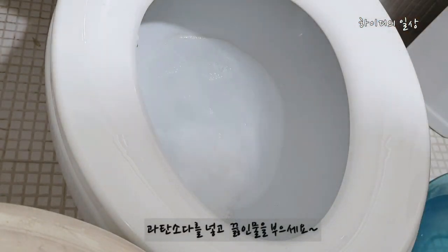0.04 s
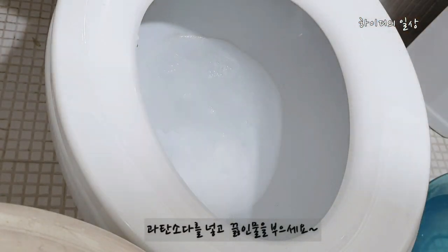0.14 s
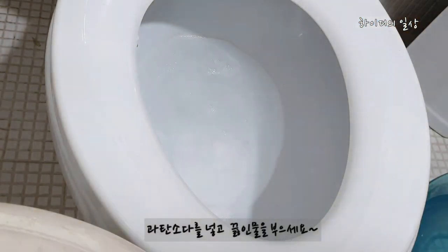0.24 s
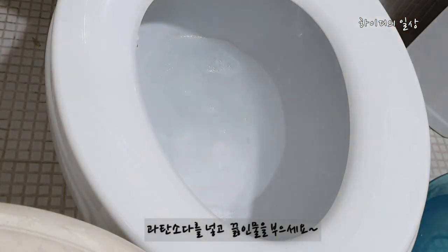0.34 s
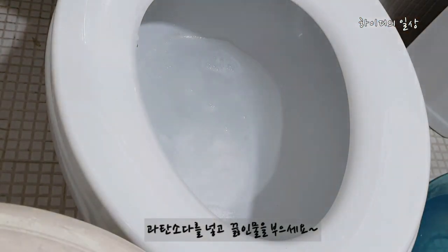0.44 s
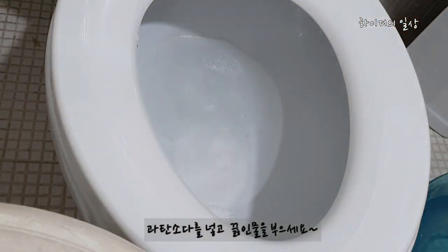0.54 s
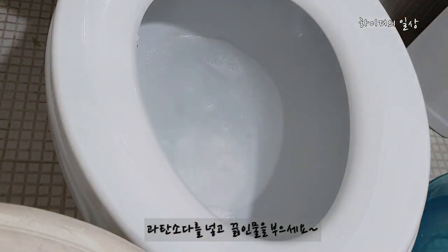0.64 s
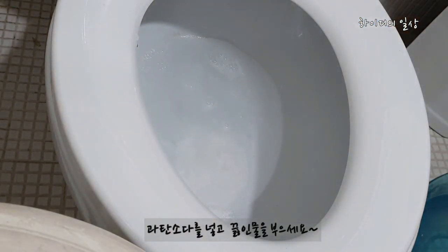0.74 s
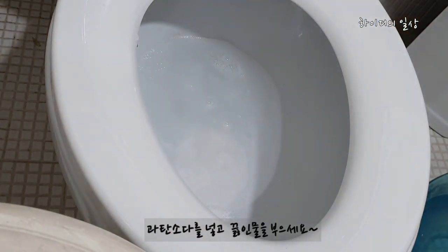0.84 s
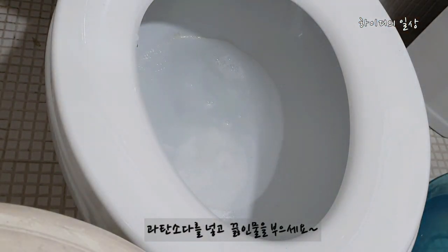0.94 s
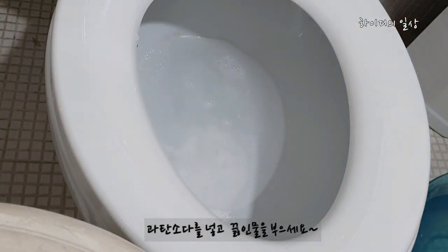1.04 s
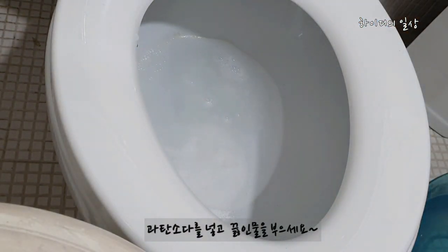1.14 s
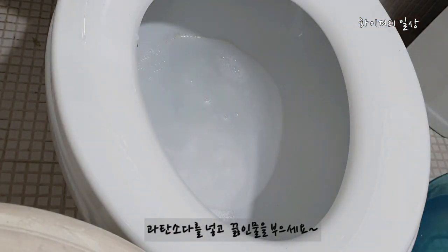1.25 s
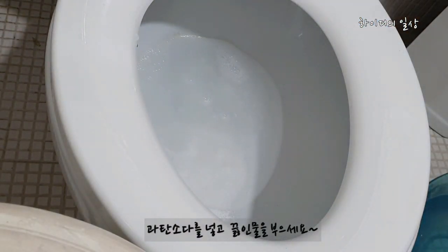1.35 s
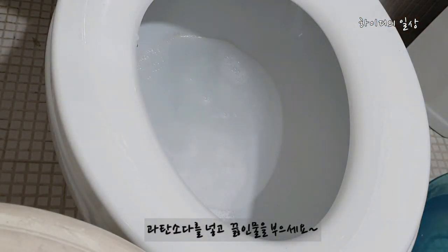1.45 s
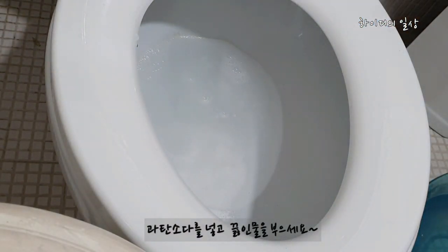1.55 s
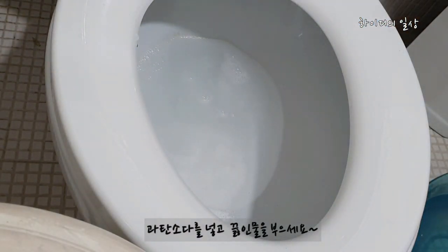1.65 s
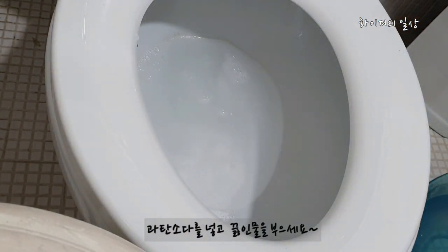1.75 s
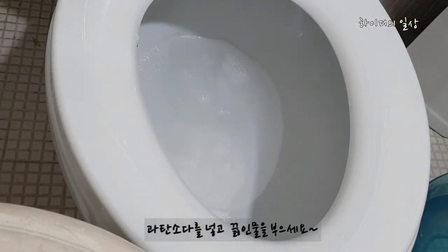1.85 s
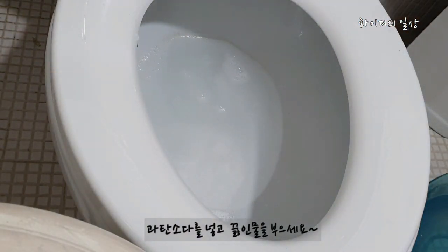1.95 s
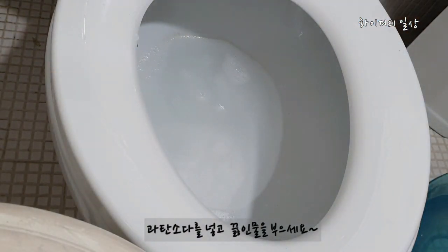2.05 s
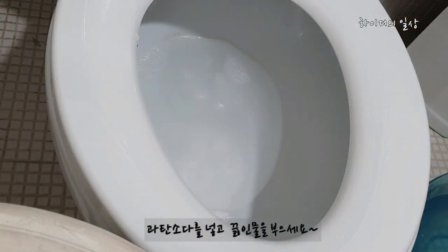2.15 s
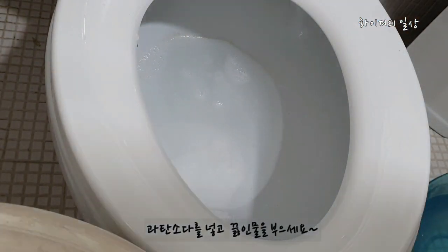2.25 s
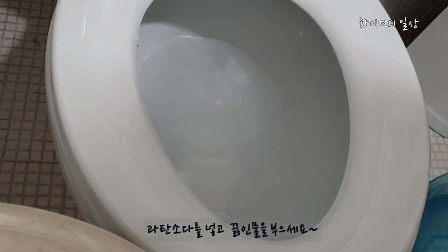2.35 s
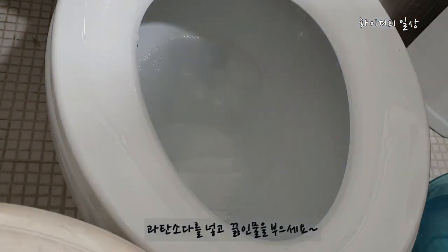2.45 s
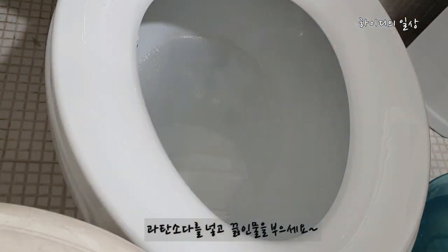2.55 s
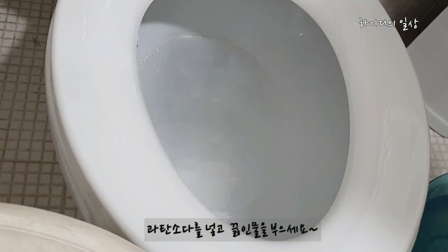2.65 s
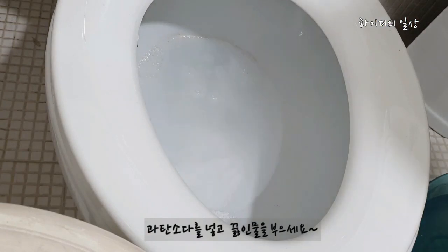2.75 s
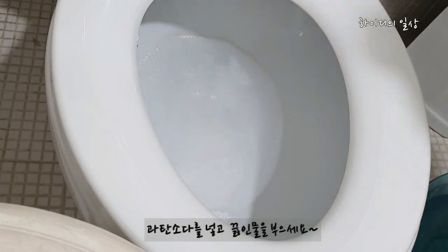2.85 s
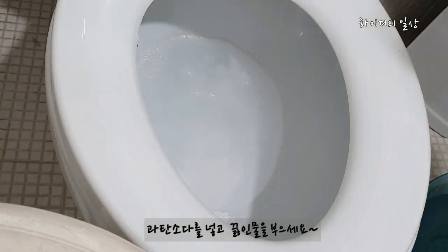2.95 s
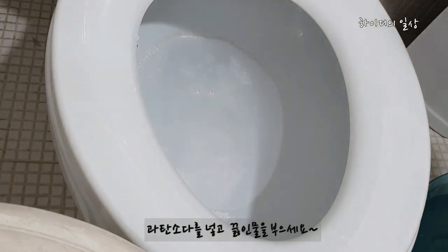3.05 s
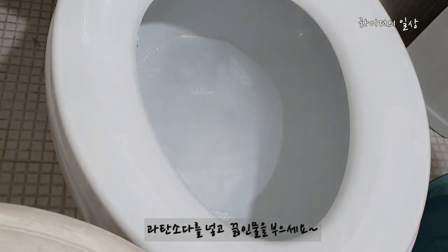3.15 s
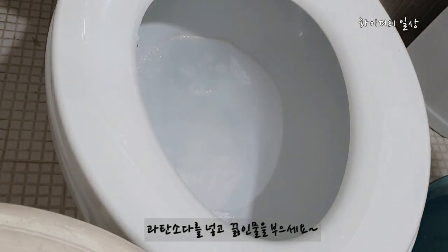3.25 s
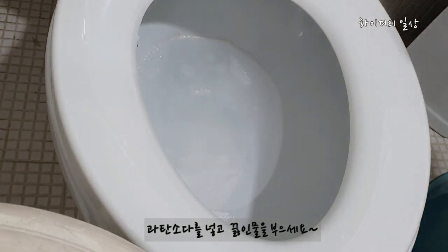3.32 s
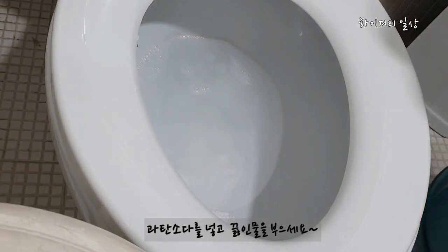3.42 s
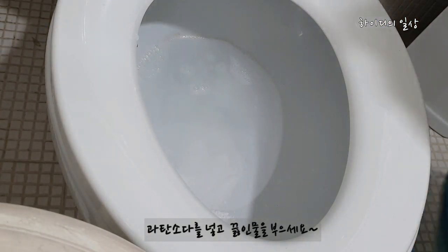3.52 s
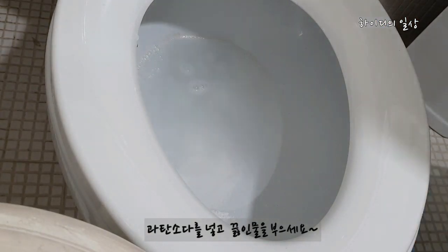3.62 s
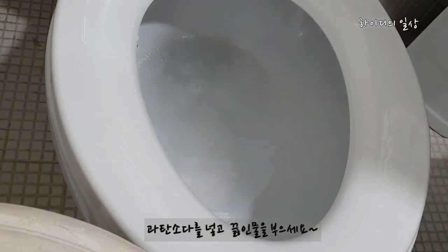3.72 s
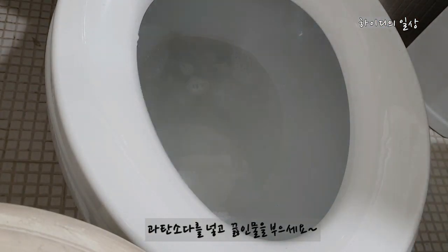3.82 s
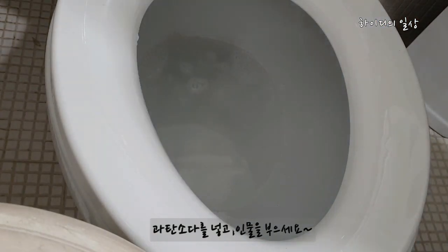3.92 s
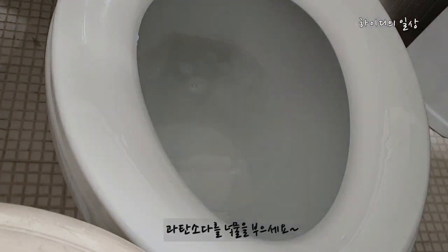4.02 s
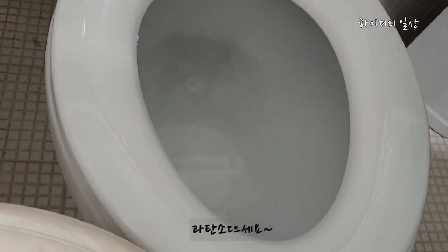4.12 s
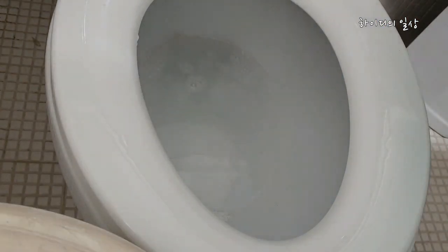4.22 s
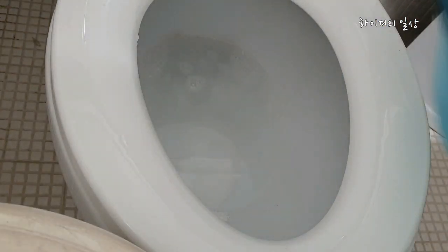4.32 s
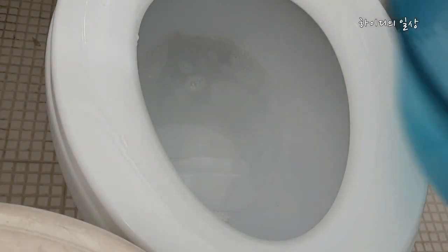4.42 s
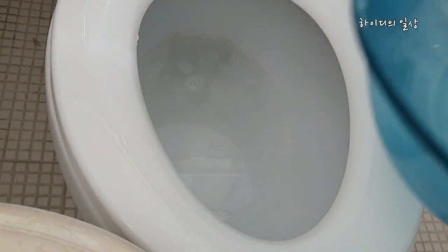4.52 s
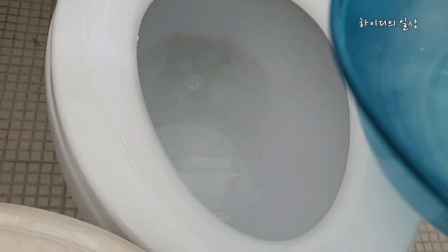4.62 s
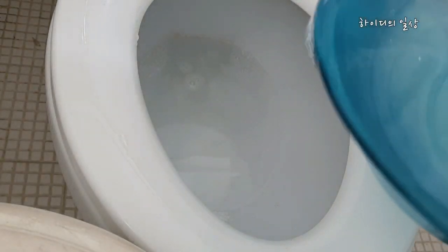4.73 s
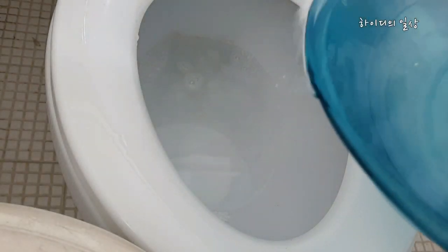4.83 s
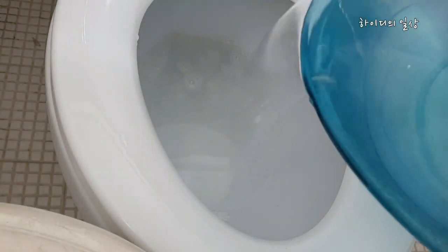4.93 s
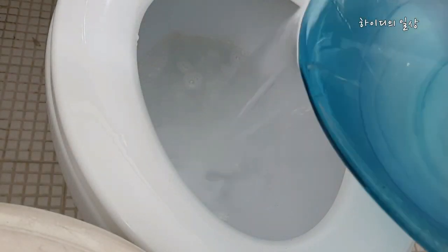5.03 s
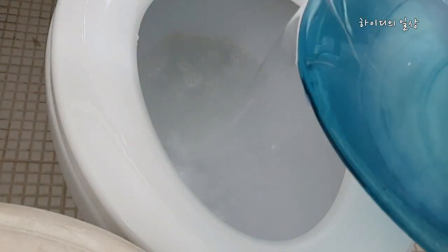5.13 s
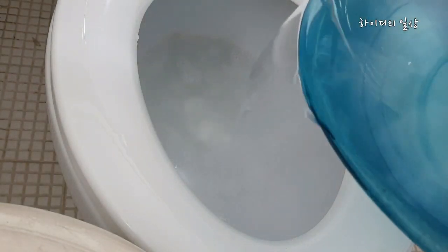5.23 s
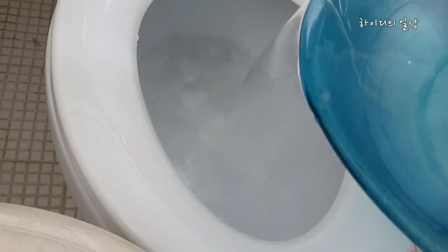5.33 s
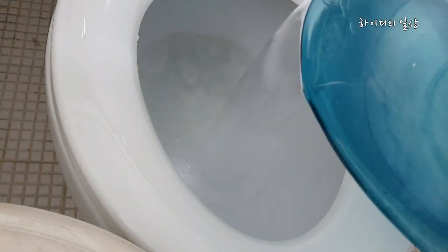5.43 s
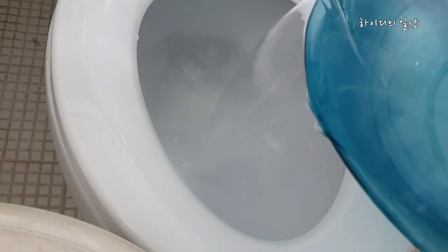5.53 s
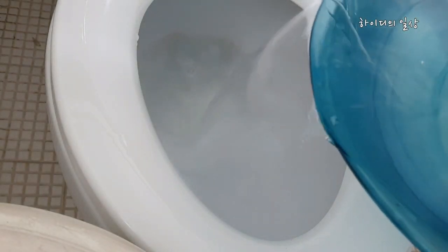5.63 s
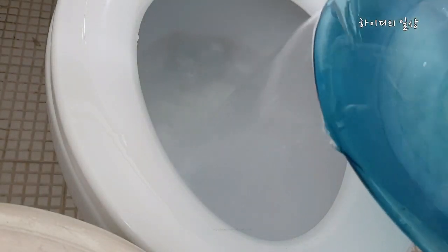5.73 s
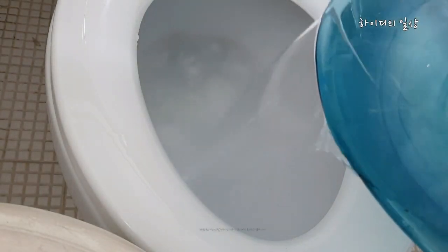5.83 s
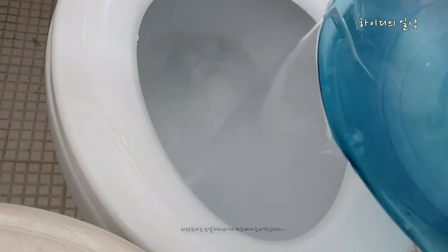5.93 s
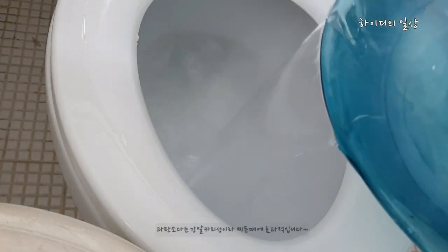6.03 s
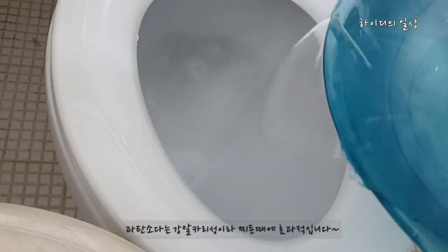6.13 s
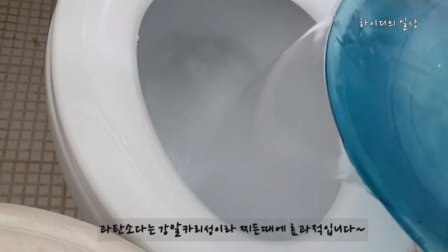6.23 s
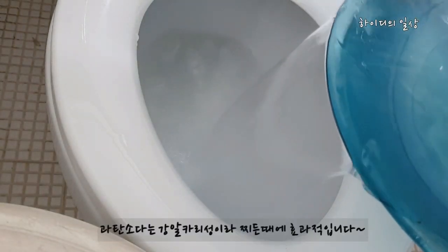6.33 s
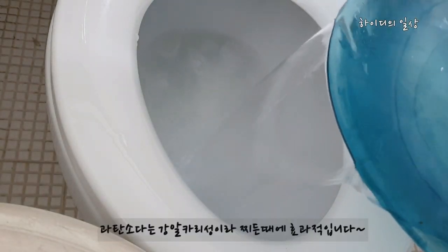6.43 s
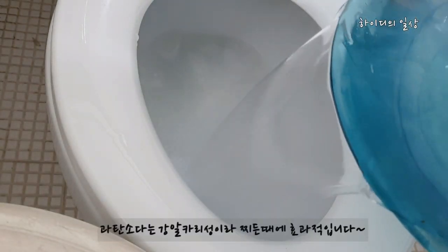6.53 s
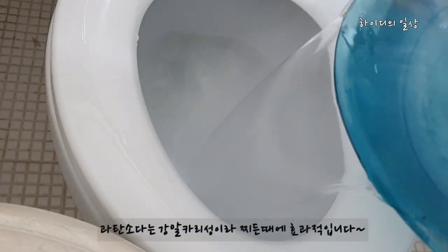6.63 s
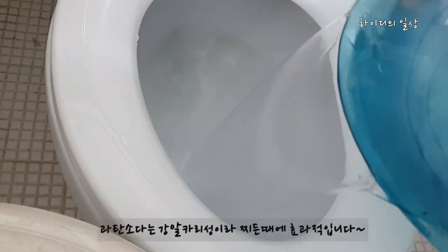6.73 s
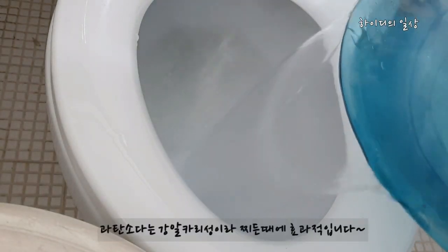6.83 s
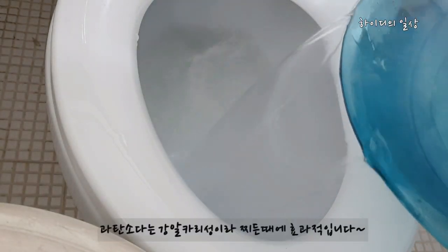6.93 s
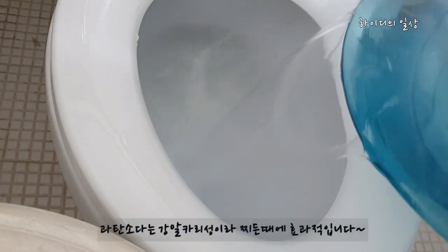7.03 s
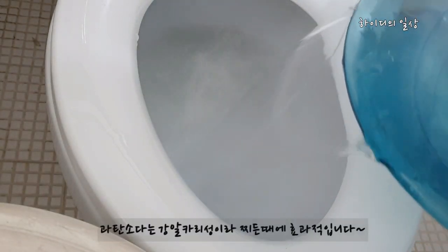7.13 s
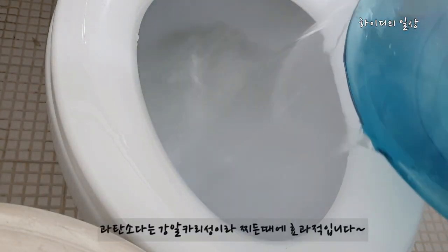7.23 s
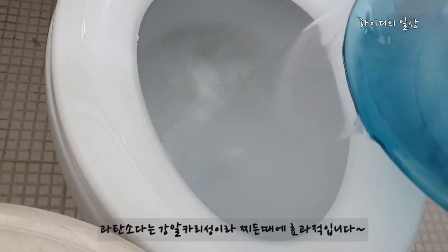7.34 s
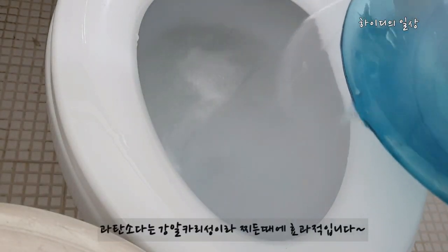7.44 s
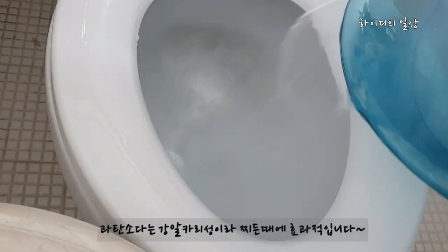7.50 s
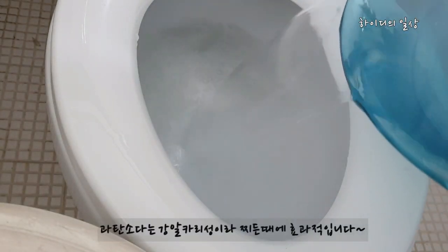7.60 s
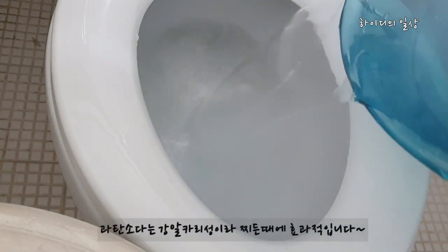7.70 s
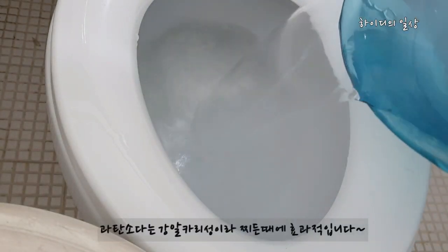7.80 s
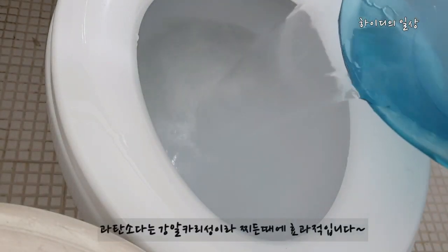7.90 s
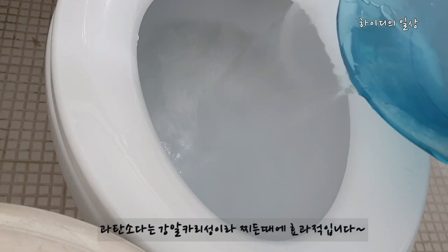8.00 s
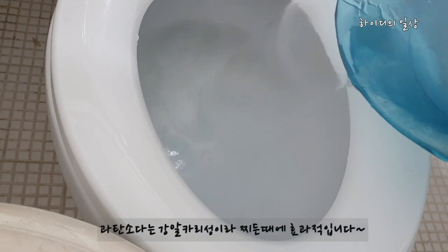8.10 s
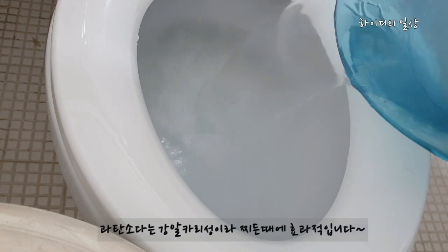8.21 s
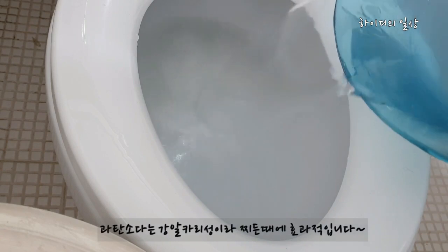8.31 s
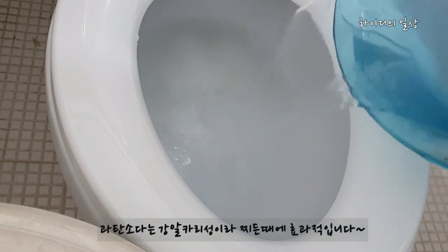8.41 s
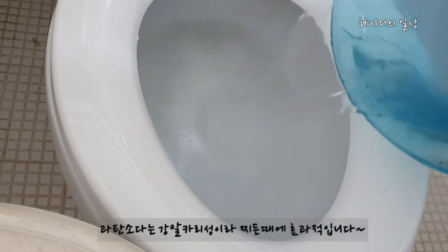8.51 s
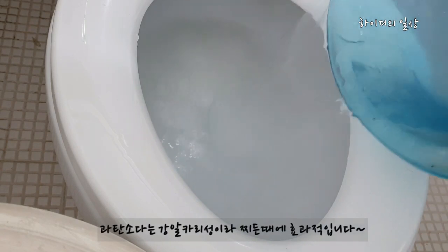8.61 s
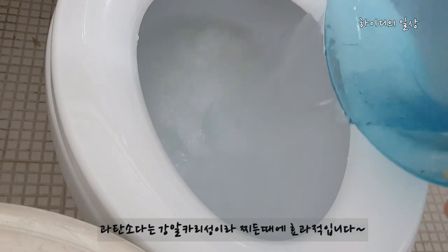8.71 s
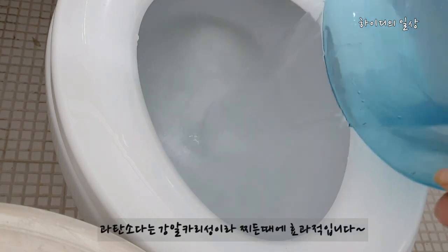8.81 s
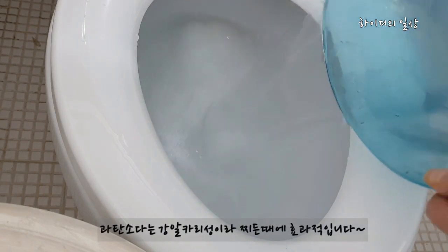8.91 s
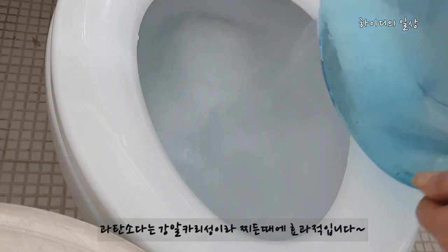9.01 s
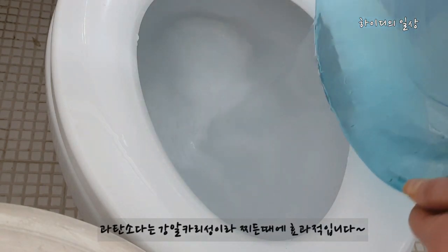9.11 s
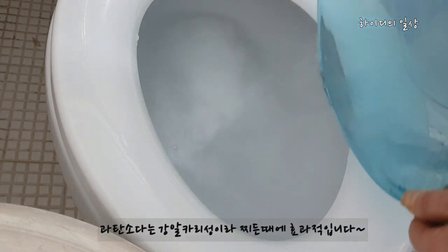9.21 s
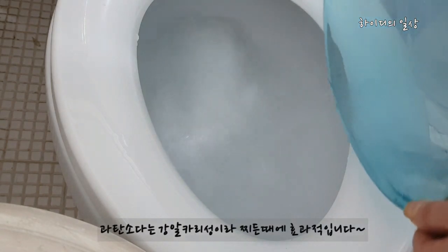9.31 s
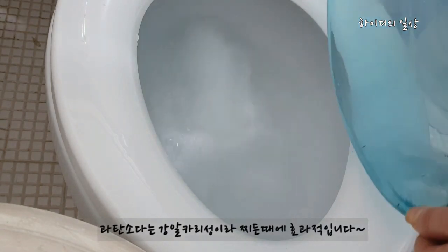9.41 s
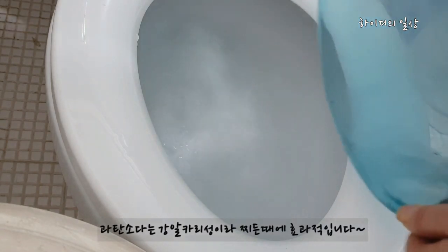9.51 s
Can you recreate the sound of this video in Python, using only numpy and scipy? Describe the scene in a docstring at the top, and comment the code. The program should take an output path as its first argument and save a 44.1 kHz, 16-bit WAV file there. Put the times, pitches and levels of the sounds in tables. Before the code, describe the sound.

A small tiled bathroom, heard close in stereo, with a faint hiss and a low throbbing rumble that fades after the opening seconds. From 0 to 1 s a plastic basin gives soft dull knocks, thin ticks and brief floor scuffs. At about 1.25 s it rocks with a heavy hollow clunk, a quick clatter of blows dying within 0.2 s. Sparse light knocks and ticks follow from 2 to 4.2 s, a clearer one near 3.2 s. At 4.5 s it bumps the toilet seat dully, then taps faintly. A sharper knock at 5.07 s launches the pour: a full, bright, fizzing splash with dense bubbles, surging until about 7.5 s, resonating in the bowl. From 7.7 s deep gulps around 300 Hz take over, strongest near 7.9 s. After 8.4 s the stream is thin and broken, with plops, slaps and drips continuing to about 9.5 s.

```python
"""A plastic basin is handled in a small tiled bathroom: impacts excite its damped modes in knocks,
scuffs and a heavy clunk. It then bumps a toilet seat, tips and is emptied into the bowl.
The falling sheet of water is a swarm of damped-sine bubbles of all sizes with fine spray and slaps.
As it thins, deep gulps take over. Echoes and air modes of the bowl color the water and the contacts;
lingering notes, a low throbbing rumble and a faint hiss stay outside that resonance."""
import sys
import numpy as np
from scipy import signal
from scipy.fft import rfft, irfft, next_fast_len
from scipy.io import wavfile
from scipy.ndimage import uniform_filter1d

SR = 44100
rng = np.random.default_rng(int(sys.argv[2]) if len(sys.argv) > 2 else 0)


def to_wav(sig):
    """Store sig (one row per channel, or 1-D mono) as 16-bit WAV at the path in sys.argv[1].

    Samples outside -1..1 are clipped; the rate is SR.
    """
    pcm = np.clip(np.atleast_2d(sig), -1, 1) * 32767
    pcm = np.round(pcm).astype(np.int16)
    wavfile.write(sys.argv[1], SR, pcm.T)  # frames by channels


N = 421596
TIME = np.arange(N) / SR

# In every table level_db is relative: the source or filter that reads it may add its own gain.
# strength of the stream as the basin tips and empties: start_s, level_db
STREAM_FLOW = [(5.15, 0), (5.35, 0), (5.48, -3.5), (5.58, 0), (5.76, -3.5), (5.92, 1), (6.36, -1.5),
               (6.9, 1.5), (7.3, 1.5), (7.55, -2), (8.0, -3.5), (8.3, -4.5), (8.4, -7), (9.0, -8.5),
               (9.56, -8)]
# lumps of water that swell or slightly thin the splash: start_s (center), added level_db
FLOW_SURGES = [(5.17, 5), (5.56, 3.5), (5.63, -1.5), (5.93, 1), (6.03, -0.5), (6.14, 1), (6.23, 2),
               (6.49, 3.5), (6.78, 1.5), (7.68, 0.5), (7.86, 4.5), (7.93, 0.5), (8.25, 1.5), (8.69, 0),
               (9.41, 4), (9.49, 0.5)]
# how hard the water gulps air under the surface: start_s, level_db
GULP_LEVEL = [(5.15, -41), (5.26, -45.5), (5.43, -43.5), (5.6, -46.5), (6.3, -43.5), (6.8, -44.5),
              (6.95, -43), (7.72, -35.5), (7.88, -32), (8.28, -37.5), (8.38, -38.5), (8.7, -38),
              (8.87, -42), (8.99, -38.5), (9.33, -42.5), (9.41, -42), (9.56, -42)]
# size of the gulped bubbles, deeper as the sheet thins: start_s, pitch_factor [ratio]
GULP_PITCH = [(5.07, 0.43), (5.2, 1.56), (5.4, 1.39), (7.68, 1.47), (7.85, 0.92), (9.56, 0.95)]
# spectral tint of the swarms: pitch_hz, gain_db
WATER_TINT = [(40, -14), (100, -8), (200, -5.5), (300, -5), (550, -0.5), (1000, 0.5), (1800, -3.5),
              (2600, 2), (4500, -3), (5500, -2.4), (7600, 0.5), (8700, 0.5), (11000, 5), (12500, 12),
              (16000, 12)]
# clouds of like-sized bubbles dragged under by folds: start_s, length_s, level_db, pitch_hz
BUBBLE_CLOUDS = [(5.089, 0.023, -34.5, 8060), (5.327, 0.019, -32, 1116), (5.605, 0.025, -23.5, 2770),
                 (5.642, 0.021, -26, 1510), (5.792, 0.014, -30, 2380), (5.832, .03, -31, 1160),
                 (5.898, 0.1, -33, 2730), (5.915, 0.025, -29, 1700), (6.009, 0.029, -25.5, 1410),
                 (6.088, 0.0098, -39, 2950), (6.125, 0.016, -30, 2950), (6.192, 0.062, -28, 3900),
                 (6.347, 0.018, -30.5, 1420), (6.423, .02, -35.5, 910), (6.44, 0.013, -29.5, 2870),
                 (6.501, .04, -27.5, 1123), (6.711, 0.016, -30.5, 1900), (6.737, 0.11, -35.5, 438),
                 (6.802, 0.0068, -25.5, 1520), (6.887, 0.033, -34, 806), (6.94, .13, -27.5, 1930),
                 (6.993, 0.014, -30, 1900), (7.033, 0.02, -29, 890), (7.205, 0.044, -29, 740),
                 (7.233, 0.12, -25, 1530), (7.245, 0.014, -28, 1900), (7.311, 0.063, -30, 870),
                 (7.489, 0.27, -35, 464), (7.528, 0.017, -26.5, 1335), (7.635, 0.079, -26.5, 1510),
                 (7.7, 0.18, -39.5, 657), (8.23, 0.037, -45, 2430), (8.6, 0.098, -39.5, 1200),
                 (9.143, 0.044, -36, 1900), (9.28, 0.05, -34, 1820)]
# single loud bubbles: start_s, level_db, pitch_hz
LOUD_BUBBLES = [(5.081, -36, 233), (5.141, -20.5, 3920), (5.184, -26.5, 1104), (5.21, -30, 740),
                (5.221, -25, 2570), (5.238, -13, 2540), (5.30, -36, 720), (5.403, -30, 895),
                (5.417, -33, 462), (5.534, -22, 940), (5.61, -21, 2890), (5.62, -29, 927),
                (5.717, -25.5, 965), (6.02, -34, 1370), (6.056, -28.5, 420), (6.107, -24.5, 1098),
                (6.544, -32, 412), (6.14, -43.5, 300), (6.667, -36, 362.4), (6.754, -34, 440),
                (6.8, -25.5, 1600), (6.867, -27, 888), (6.926, -15.5, 2590), (7.134, -33.5, 395),
                (7.139, -27, 923), (7.162, -40, 890), (7.226, -36, 280), (7.279, -27, 1030),
                (7.329, -36, 272), (7.424, -28.5, 1001), (7.53, -37, 516), (7.638, -30, 806),
                (7.703, -28.5, 630), (7.717, -32, 1267), (7.802, -33, 285), (7.853, -22.5, 301),
                (7.911, -25, 297), (7.915, -24.5, 620), (7.948, -26.5, 1152), (7.999, -36, 1290),
                (8.022, -31, 301), (8.053, -25, 293), (8.074, -47, 333), (8.105, -30, 301),
                (8.116, -30, 1213), (8.145, -29.5, 301), (8.18, -28, 301), (8.19, -31.5, 1270),
                (8.202, -27, 297), (8.212, -43, 410), (8.233, -34, 1260), (8.234, -23, 307),
                (8.263, -25.5, 295), (8.31, -37, 632), (8.456, -30, 260), (8.459, -37, 656),
                (8.461, -39, 1320), (8.492, -31, 593), (8.494, -35, 307), (8.525, -33.5, 1253),
                (8.569, -27.5, 2640), (8.576, -35, 301), (8.627, -30.5, 301), (8.66, -38, 1270),
                (8.668, -34.5, 622), (8.689, -32, 1359), (8.735, -29, 303), (8.802, -29, 297),
                (8.823, -28, 310), (8.838, -38, 627), (8.869, -28, 300), (8.899, -29, 286),
                (8.979, -43, 640), (9.077, -43, 408), (9.179, -37, 265), (9.237, -38, 764),
                (9.249, -40, 400), (9.282, -31, 361), (9.382, -25, 260), (9.383, -33, 898),
                (9.47, -36.5, 914), (9.484, -28, 264), (9.511, -33, 297), (9.515, -41, 893)]
# decay of a loud bubble, longest in the middle sizes: pitch_hz, decay_cycles
BUBBLE_DECAY = [(280, 1.95), (450, 8.5), (1050, 10.3), (2600, 7.2), (4000, 4.4)]
# loudest drops slapping the porcelain: start_s, level_db, pitch_hz
DROP_SLAPS = [(5.127, -24, 13400), (5.355, -25, 5600), (5.409, -27, 12000), (5.572, -24, 5600),
              (5.6192, -23, 9000), (6.027, -24, 13400), (6.235, -16.5, 6400), (6.471, -28, 5080),
              (6.767, -25, 11900), (6.931, -30, 6200), (7.029, -25, 3630), (7.394, -25, 7800),
              (7.497, -25.5, 2650), (7.8523, -22.5, 5240), (7.852, -24, 13400), (7.895, -24.5, 5000),
              (7.897, -35, 13500), (7.987, -28, 6160), (8.02, -19, 12200), (8.02, -27, 5030),
              (8.134, -22, 10900), (8.189, -29, 9000), (8.236, -23.5, 2560), (8.456, -30, 3700),
              (8.4906, -22.5, 5000), (8.53, -36, 5500), (8.628, -24, 12700), (8.684, -35.5, 2380),
              (8.742, -36, 8100), (8.783, -28.5, 10800), (8.802, -27.5, 2380), (8.916, -36, 1720),
              (8.952, -33, 1900), (9.016, -29, 4840), (9.047, -33.5, 7360), (9.067, -30.5, 1900),
              (9.082, -34, 4090), (9.169, -29, 4090), (9.226, -27, 5000), (9.279, -25, 2420),
              (9.383, -27.5, 1900), (9.407, -25, 3320), (9.407, -19, 9500), (9.514, -35, 7100)]
# balance of the water between the sides: pitch_hz, left_minus_right_db
STEREO_LEAN = [(60, -3.5), (110, 3.5), (200, -1.5), (380, 4.5), (700, -1.5), (1290, 2), (2380, 2.5),
               (4400, -1), (8120, -3), (15000, -2.5)]
# air modes of the bowl: pitch_hz (before scatter), level_db (over the direct sound), t60_s
BOWL_MODES = [(130, 9, 0.44), (183, 2, 0.82), (268.7, 11.5, 0.1), (301, 15.5, 0.23), (341, -1.5, 0.36),
              (410, 5.5, 0.41), (450.8, 8.5, 0.18), (649.8, 10, 0.088), (737.5, 6.5, 0.073),
              (881, 2.5, 0.11), (981, 12.5, 0.12), (1160, 8, 0.18), (1268, -2, 0.18), (1353, 8.5, 0.11),
              (1475, 3.5, 0.3), (1693, 3.5, 0.092), (1967, 1.5, 0.12), (2595, -5, 0.3)]
# reverberation of the tiled room: pitch_hz, t60_s
ROOM_DECAY = [(150, 0.31), (400, 0.17), (1000, 0.18), (2800, 0.18), (7000, 0.2), (16000, 0.13)]
# left-right likeness of diffuse sound: pitch_hz, correlation [-1 to 1]
STEREO_LIKENESS = [(100, 0.91), (300, 0.7), (640, 0.58), (1200, 0.1), (3000, 0), (16000, 0.066)]
# knocks of the basin: start_s, level_db, dull_above_hz, treble_slope_db (per octave), decay_s
BASIN_KNOCKS = [(0.092, -43.5, 2260, 5, 0.0019), (0.185, -53, 2940, 10, 0.042),
                (0.321, -42, 700, 14, 0.0022), (0.425, -55, 2160, 32, 0.0077),
                (0.592, -43, 2660, 19, 0.0045), (0.735, -46, 118, 18.5, 0.037),
                (0.912, -51, 1150, 18, 0.016), (1.985, -58, 5000, 1, 0.091), (2.007, -47, 3470, 4, 0.0075),
                (2.025, -42.5, 1300, 5, 0.016), (2.317, -48.5, 280, 43, 0.035),
                (2.348, -46, 650, 15, 0.028), (2.572, -48, 1180, 13.5, 0.036),
                (2.6, -50.5, 1490, 14, 0.0089), (2.921, -49.5, 370, 12, 0.01), (2.997, -41, 423, 23, 0.015),
                (3.002, -56, 1900, 28, 0.0087), (3.084, -56.5, 3500, 9, .004),
                (3.242, -35.5, 1420, 4, 0.0055), (3.256, -37, 1540, 25, 0.0032),
                (3.775, -43.5, 1550, 13, 0.011), (4.218, -51.5, 2080, 23, 0.032),
                (4.517, -50, 2000, 15, 0.02), (4.538, -44.5, 1900, 15, 0.01),
                (5.066, -25, 1000, 16.5, 0.0051), (5.084, -34, 447, 27, 0.034)]
# modes of the basin's wall: pitch_hz (before flexing), level_db, t60_s
WALL_MODES = [(643, 2, 0.058), (1100, -1.5, 0.054), (1800, 3, 0.056), (2298, 0.5, 0.046), (2960, -6, 0.048),
              (3360, -6, 0.07), (3820, -20, 0.026)]
# thin, high ticks of plastic: start_s, level_db, decay_s
PLASTIC_TICKS = [(0.047, -44, 0.0031), (0.195, -35.5, 0.0042), (0.617, -40.5, 0.023), (1.245, -35, 0.0072),
                 (1.284, -33, 0.029), (1.352, -37, 0.0064), (2.01, -47, 0.12), (2.72, -28.5, 0.0046),
                 (3.244, -44, 0.0079), (4.521, -45.5, 0.021)]
# the basin scuffs along the floor: start_s, length_s, level_db, lowest_hz, dull_above_hz
FLOOR_SCUFFS = [(0.32, 0.0626, -39, 152, 670), (0.397, 0.046, -50, 310, 520), (0.589, 0.031, -42, 280, 410)]
# blows of the heavy clunk as the basin rocks: start_s, level_db, lowest_hz, dull_above_hz
CLUNK_BLOWS = [(1.245, -17, 324, 2170), (1.258, -22.5, 455, 1500), (1.27, -27, 220, 400),
               (1.283, -21, 187, 800), (1.288, -23.5, 700, 1800), (1.293, -23.5, 190, 300),
               (1.307, -32, 600, 1300), (1.312, -26, 240, 700), (1.324, -27, 950, 1700),
               (1.351, -31, 261, 650), (1.369, -37, 600, 1400), (1.385, -36.5, 230, 400),
               (1.425, -47, 280, 800)]
# modes of the heavy clunk: pitch_hz (before flexing), level_db, t60_s
HOLLOW_MODES = [(215, -1.5, 0.17), (261, -2, 0.24), (291.3, 4, 0.15), (346, 1, 0.19), (360, -0.5, 0.31),
                (450, -7.5, 0.17), (675.4, 0, 0.25), (752, -5.5, 0.18), (810, -8.5, 0.2), (970, -14.5, 0.1),
                (1240, -3.5, 0.065), (1392, 0, 0.077), (2040, -11, .06), (2347, -16.5, .06)]
# bump on the seat, then faint taps: start_s, level_db, lowest_hz, dull_above_hz, decay_s
SEAT_CONTACTS = [(4.515, -33.5, 367, 780, 0.019), (4.644, -51.5, 650, 1350, 0.002),
                 (4.732, -54, 680, 1350, 0.0014), (4.757, -63, 650, 1000, 0.014),
                 (4.82, -63, 950, 1310, 0.014), (4.887, -62, 1080, 1450, .003),
                 (4.962, -62, 1100, 1400, 0.0025)]
# modes of the seat: pitch_hz (before flexing), level_db, t60_s
SEAT_RING = [(207, 4, 0.093), (484, -10, 0.042), (670, 0, 0.039), (835, 5, 0.039), (1020, -5, 0.076),
             (1540, -13, .04)]
# notes left ringing by bumps: start_s, level_db, pitch_hz, t60_s
LINGERING_NOTES = [(0.618, -54, 350, 0.34), (0.745, -76, 131, 0.15), (2.061, -62.5, 130, 0.53),
                   (3.257, -51.5, 1110, 0.22), (4.403, -62, 101.8, 1.9), (4.522, -45, 183, 0.38),
                   (4.53, -58.5, 130, 0.98), (5.088, -45, 130, 0.66)]
# shape of the rumble's noise: pitch_hz, relative density_db (per Hz)
RUMBLE_SPECTRUM = [(10, -22), (24, -21.5), (30, -23), (33, 4), (36, -7.5), (45, -21.5), (70, -22),
                   (130, -49.5), (250, -84), (600, -120)]
# rumble over time: start_s, level_db
RUMBLE_COURSE = [(0, -47), (0.8, -49), (1.8, -47.5), (2.0, -54), (2.7, -59), (3.0, -52.5), (3.7, -53.5),
                 (4.0, -60), (5.8, -66), (7.8, -63), (9.0, -56)]
# shape of the faint hiss: pitch_hz, relative density_db (per Hz)
HISS_SPECTRUM = [(35, -30), (60, -3.5), (118, -16.5), (227, -14), (262, -22), (294, -18.5), (1110, -29),
                 (2650, -31.5), (8120, -39), (13300, -35.5), (16000, -34)]
# hiss over time: start_s, level_db
HISS_COURSE = [(0.2, -64.5), (0.8, -66.5), (1.6, -72.5), (2.15, -68), (2.6, -70.5), (3.05, -68), (3.5, -73),
               (4.3, -70), (5.0, -75.5)]

POUR_START_S, POUR_ATTACK_S = 5.07, 0.094  # the water reaches the bowl and builds to a full sheet
SURGE_S = 0.041  # half width of a surge, where it has fallen to 1/e
BABBLE_SWELL_DB, BABBLE_SWELL_AT_S, BABBLE_SWELL_S = 2, 7.44, 0.36  # middling bubbles gain for a while
CROWDING = 0.35  # share of a change in flow level that changes the density of bubbles
WANDER_S = 0.07  # the stream stays this long on one pair of spots
MODE_SCATTER = 0.018  # share by which the bowl's modes differ from spot to spot, fully in the upper ones
KNOCK_SPAN = 2.57  # a knock's body reaches down to its dull point divided by this
EDGE_HZ = 16050  # upper edge of the recorder's band


def pour(count=6):
    """Superposition: bubbles and spray of every size; splash follows the flow, deep gulps their own level."""
    splash_db = flow()
    for s, db in FLOW_SURGES:
        splash_db = splash_db + db * np.exp(-((TIME - s) / SURGE_S) ** 2)
    gulping_db = over_time(GULP_LEVEL)
    babble_swell_db = BABBLE_SWELL_DB * np.exp(-((TIME - BABBLE_SWELL_AT_S) / BABBLE_SWELL_S) ** 2)
    places = [bowl_response(wall_db=5.0, room_db=6.0, ring_db=9.5) for _ in range(count)]
    gulps = swarm(gulping_db - 1.44, places, low_hz=240.0, high_hz=470, cycles=0.73, rise=0.021,
                  spread_db=3.0, slope_db=-14.5, count=700, size=2000, depth=over_time(GULP_PITCH))
    glugs = swarm(gulping_db - 9, places, low_hz=350, high_hz=714, cycles=4.2, rise=0.036,
                  spread_db=8.5, slope_db=4.0, count=320, size=2200)
    babble = swarm(1.07 * splash_db + babble_swell_db - 38.0, places, low_hz=740, high_hz=1900,
                   cycles=5.4, rise=0.012, spread_db=3.5, slope_db=7.0, count=2300, size=800)
    fizz = swarm(splash_db - 37.5, places, low_hz=1747, high_hz=5230, cycles=4.0, rise=0.017,
                 spread_db=4.0, slope_db=-0.5, count=3800, size=300)
    spray = swarm(0.92 * splash_db - 43, places, low_hz=5000, high_hz=18000, cycles=1.0, rise=0.0085,
                  spread_db=5.0, slope_db=-12.0, count=6000, size=60)
    # a few drops land close by, dry and sharp
    near = [bowl_response(wall_db=-5.5, room_db=1.5, ring_db=-1) for _ in range(count)]
    ticks = swarm(splash_db - 48, near, low_hz=3900, high_hz=16200, cycles=0.92, rise=0.01,
                  spread_db=2.0, slope_db=-6.0, count=280, size=50)
    # negative crowding: the thinner the sheet, the more of it falls as separate drips
    drips = swarm(-0.016 * flow() - 56, near, low_hz=1000, high_hz=4600, cycles=1.0, rise=0.03,
                  spread_db=6.0, slope_db=3.0, count=160, size=400, crowding=-0.5)
    water = gulps + glugs + babble + fizz + spray + ticks + drips
    return tint(water, WATER_TINT) * amp(breaks())


def swarm(level_db, responses, low_hz, high_hz, cycles, rise, spread_db, slope_db, count, size,
          depth=1, swell=0.43, crowding=CROWDING):
    """Random point process: damped bubbles whose density in time follows a power of the flow."""
    when, pitch, strength, life = rng.random((count, 4)).T[:, :, None]
    first = int(POUR_START_S * SR)
    length = N - first
    t = TIME[:size]

    poured = np.cumsum(amp(flow()[first:]) ** (2 * crowding))
    start = np.searchsorted(poured, when * poured[-1])
    hz = low_hz * (high_hz / low_hz) ** pitch * np.broadcast_to(depth, N)[first + start]
    ring = cycles * 2 ** (2 * life - 1)
    db = spread_db * np.minimum(-np.log(strength), 4) + slope_db * pitch * np.log2(high_hz / low_hz)

    fade = 1 - (np.arange(size) / size) ** 2
    grains = amp(db) * np.sqrt(hz / ring) * bubble(hz * t, ring, rise) * fade
    grains = grains * (1 - np.exp(-hz * t / swell))  # a soft start keeps the bass clear

    # the stream wanders, hitting two spots at a time
    route = rng.integers(len(responses), size=(128, 2))
    stay = (start[:, 0] / SR / WANDER_S).astype(int) % len(route)
    spot = route[stay, np.arange(count) % 2]
    wet = np.zeros((2, length))
    for k, response in enumerate(responses):  # each place in the bowl has its own echoes
        here = spot == k
        samples = (start[here] + np.arange(size)).ravel()
        dry = np.bincount(samples, grains[here].ravel(), length + size)
        wet += signal.oaconvolve(dry[None], response, axes=1)[:, :length]

    # even out the slow power, then impose the wanted level
    power = uniform_filter1d(uniform_filter1d((wet ** 2).mean(0), size=4500), size=3000)
    attack = np.minimum(TIME[:length] / POUR_ATTACK_S, 1) ** 2
    wet = wet / np.sqrt(abs(power) + power.max() / 1e4) * amp(level_db[first:]) * attack
    return np.pad(wet, ((0, 0), (first, 0)))


def bubble(turns, cycles, rise):
    """Damped oscillation: a bubble's pitch climbs as it nears the surface, dying by 1/e in its cycles."""
    age = turns / cycles
    return np.sin(2 * np.pi * turns * (1 + rise * age)) * np.exp(-age)


def flow():
    """Source strength: the level of the stream in dB at every sample."""
    return over_time(STREAM_FLOW)


def breaks(gap_db=-4, gap_s=0.015, burst_db=1.0, burst_s=0.0035, thin_db=-7):
    """Amplitude modulation: a thinning stream breaks up, lulling before each slap and surging after."""
    swing = np.zeros(N)
    for s, _, _ in DROP_SLAPS:
        away = abs(TIME - s)
        lull, burst = gap_db * np.exp(-away / gap_s), burst_db * np.exp(-away / burst_s)
        swing += np.where(TIME < s, lull, burst)
    thinness = np.clip(flow() / thin_db, 0, 1)
    return uniform_filter1d(swing, size=64) * thinness


def clouds(octaves=0.3, cycles=3.55, rise=0.013, spread_db=5, swell=0.47, count=22):
    """Bubble cloud: a fold in the stream breaks into a quick run of bubbles of about one size."""
    out, t = np.zeros((2, N)), TIME[:SR // 16]
    places = [bowl_response(wall_db=1.0, room_db=1.0, ring_db=4.0) for _ in range(4)]
    for s, length, db, hz in BUBBLE_CLOUDS:
        dry = np.zeros((1, SR // 3))
        for when, size, strength in rng.random((count, 3)):
            turns = hz * 2 ** (octaves * (2 * size - 1)) * t
            ring = bubble(turns, cycles, rise) * (1 - np.exp(-turns / swell))
            add(dry, when * length, amp(2 * spread_db * strength) * ring[None])
        add(out, s, heard(dry[0], rng.choice(places), db))
    return out


def plops(gain_db=-2.4, rise=0.021, swell=0.21, brood_db=-6, brood_s=0.028, brood_octaves=0.67, count=3):
    """Volume resonance: loud bubbles swell, ring and shed lesser ones near their own size."""
    out, t = np.zeros((2, N)), TIME[:SR // 8]
    places = [bowl_response(wall_db=-1.0, room_db=-2.0, ring_db=4.5) for _ in range(2 * count)]
    for s, db, hz in LOUD_BUBBLES:
        ring = bubble(hz * t, read(BUBBLE_DECAY, hz), rise) * (1 - np.exp(-hz * t / swell))
        add(out, s, heard(ring, rng.choice(places), db + gain_db))
        for late, size in rng.random((count, 2)):
            small_hz = hz * 2 ** (brood_octaves * (2 * size - 0.7))
            ring = bubble(small_hz * t, 1.3, rise) * (1 - np.exp(-small_hz * t / swell))
            small_db = db + brood_db - 6 * late
            add(out, s + late * brood_s, heard(ring, rng.choice(places), small_db))
    return out


def slaps(gain_db=-2.0, cycles=0.87, splatter=0.28, splatter_s=0.0033, count=6):
    """Impact radiation: a drop hits the porcelain with a tick and scatters into droplets."""
    out, t = np.zeros((2, N)), TIME[:SR // 40]
    places = [bowl_response(wall_db=0.0, room_db=-2.5, ring_db=12.5) for _ in range(count)]
    for s, db, hz in DROP_SLAPS:
        droplets = (t == 0) + splatter * rng.standard_normal(len(t)) * np.exp(-t / splatter_s)
        tick = np.diff(bubble(hz * t, cycles, 0))  # so small a source radiates little bass
        splat = signal.fftconvolve(droplets, tick)
        add(out, s, heard(splat, rng.choice(places), db + gain_db))
    return out


def bowl_response(wall_db, room_db, ring_db, wall_t60=0.04):
    """Impulse response: direct sound, porcelain echoes, the bowl's air modes and the tiled room."""
    t = TIME[:SR // 2]
    walls = noise_pair(len(t)) * amp(-60 * t / wall_t60) * (1 - np.exp(-t / 0.00069))
    # the room dies away at a different rate in each band
    hz, at, z = signal.stft(noise_pair(len(t)), SR, nperseg=256)
    decay = amp(-60 * at / read(ROOM_DECAY, hz)[:, None])
    room = signal.istft(z * decay, SR, nperseg=256)[1][:, :len(t)]
    room = room * (1 - np.exp(-t / 0.0069))
    out = amp(wall_db) * walls / np.linalg.norm(walls[0])
    out += amp(room_db) * room / np.linalg.norm(room[0])
    for mode_hz, db, t60 in BOWL_MODES:
        damping = np.log(1000) / t60
        mode_hz = mode_hz * (1 + MODE_SCATTER * rng.uniform(-1.02, 1) * min(mode_hz / 900, 1))
        # the two microphones see the higher modes at different phases
        skew = rng.choice([-1, 1]) * np.array([[1], [-1]]) * min((mode_hz / 950) ** 2, 0.7)
        ring = np.exp(-damping * t) * np.cos(2 * np.pi * mode_hz * t + skew)
        out += amp(db + ring_db) * 2 * damping / SR * ring
    out[0, 0] += 1  # the direct sound reaches the left microphone first
    out[1, 2] += 1
    return out


def knocks(body_db=-4.5, body_fall_db=-10, hard_hz=1300, tick_db=-3.0, thump_db=-7,
           thump_fall_db=-9, soft_hz=400, flex=0.0287, count=5):
    """Modal impact: knocks ring the basin's wall, softer ones carry more thump; thin ticks join them."""
    out = np.zeros((2, N))
    places = [bowl_response(wall_db=5.5, room_db=3.0, ring_db=-1.5) for _ in range(count)]
    for s, db, dull_hz, slope_db, dying_s in BASIN_KNOCKS:
        room, low_hz = rng.choice(places), dull_hz / KNOCK_SPAN
        add(out, s, heard(rattle(low_hz, dull_hz, slope_db, dying_s), room, db))
        blow = rattle(low_hz, dull_hz, slope_db, dying_s=0.00089, contact_s=0.000067)
        ring_db = db + body_db + body_fall_db * max(np.log2(hard_hz / dull_hz), 0)
        add(out, s, heard(struck(WALL_MODES, blow, flex), room, ring_db))
        thump = rattle(low_hz=102, dull_hz=171, slope_db=20.5, dying_s=0.013, contact_s=0.0014)
        low_db = db + thump_db + thump_fall_db * max(np.log2(dull_hz / soft_hz), 0)
        add(out, s, heard(thump, room, low_db))
    for s, db, dying_s in PLASTIC_TICKS:  # all ticks share the last knock's place
        tick = rattle(low_hz=12100, dull_hz=13000, slope_db=-7.0, dying_s=dying_s)
        add(out, s, heard(tick, room, db + tick_db))
    return from_side(out, lag_s=0.00031)


def scuffs():
    """Friction noise: dull rubbing holds its strength for as long as the basin slides."""
    out, room = np.zeros((2, N)), bowl_response(wall_db=5.5, room_db=-3.0, ring_db=-14)
    for s, length, db, low_hz, dull_hz in FLOOR_SCUFFS:
        rub = rattle(low_hz, dull_hz, slope_db=23, dying_s=0.0065, hold_s=length)
        add(out, s, heard(rub, room, db))
    return from_side(out, lag_s=0.00029)


def clunk(clatter_db=-5, flex=0.006):
    """Repeated modal excitation: quick blows ring the same hollow modes, dull ones only the lowest."""
    out = np.zeros((2, N))
    room = bowl_response(wall_db=-6.5, room_db=-10.5, ring_db=-14.5)
    walls = bowl_response(wall_db=3.0, room_db=4.5, ring_db=-1.0)
    for s, db, low_hz, dull_hz in CLUNK_BLOWS:
        contact = rattle(low_hz, dull_hz, slope_db=12.0, dying_s=0.00098, contact_s=0.00018)
        add(out, s, heard(struck(HOLLOW_MODES, contact, flex), room, db))
        clatter = rattle(low_hz, dull_hz, slope_db=12, dying_s=0.0079)
        add(out, s, heard(clatter, walls, db + clatter_db))
    return from_side(out, lag_s=-0.00028)


def tipping(ring_db=-1.0, flex=0.018):
    """Contact and resonance: the tipping basin judders on the seat, a dull contact and a short ring each."""
    out, room = np.zeros((2, N)), bowl_response(wall_db=0.0, room_db=-2.0, ring_db=-9)
    for s, db, low_hz, dull_hz, dying_s in SEAT_CONTACTS:
        contact = rattle(low_hz, dull_hz, slope_db=33, dying_s=dying_s)
        add(out, s, heard(struck(SEAT_RING, contact, flex), room, db + ring_db))
        add(out, s, heard(contact, room, db))
    return from_side(out, lag_s=-0.0003)


def rattle(low_hz, dull_hz, slope_db, dying_s, contact_s=0.00045, hold_s=0):
    """Contact force: a noise burst builds up and dies; soft contacts lose their treble."""
    t = TIME[:SR // 5]
    hz = np.fft.rfftfreq(len(t), 1 / SR) + 1
    decay = np.exp(-np.maximum(t - hold_s, 0) / dying_s)
    burst = rng.standard_normal(len(t)) * decay * (1 - np.exp(-t / contact_s))
    bass_cut_db = -10 * np.log10(1 + (low_hz / hz) ** 8)
    shape_db = bass_cut_db - slope_db * np.log2(1 + (hz / dull_hz) ** 4) / 4
    log_gain = np.log(amp(np.maximum(shape_db, shape_db.max() - 80)))
    # minimum phase, so that the filter does not ring ahead of the contact
    mirrored = np.r_[log_gain, log_gain[-2:0:-1]]
    causal = np.exp(np.conj(signal.hilbert(mirrored)))[:len(hz)]
    return irfft(rfft(burst) * causal)


def struck(modes, contact, flex):
    """Modal synthesis: a contact rings a body's modes, each detuned a little by flexing."""
    t = TIME[:SR // 3]
    ring = np.zeros(len(t))
    for hz, db, t60 in modes:
        turns = hz * (1 + flex * rng.uniform(-0.88, 1)) * t + rng.random() / (2 * np.pi)
        ring += amp(db - 60 * t / t60) * np.sin(2 * np.pi * turns)
    return signal.fftconvolve(contact, ring)


def from_side(x, lag_s):
    """Time difference: a positive lag delays the left and puts the sound right; a negative, left."""
    left = np.interp(TIME - lag_s / 2, TIME, x[0])
    right = np.interp(TIME + lag_s / 2, TIME, x[1])
    return np.array([left, right])


def hums(gain_db=3.0, swell_s=0.0004):
    """Free decay: notes linger after a bump, alike at both microphones."""
    out, t = np.zeros((2, N)), TIME[:SR]
    for s, db, hz, t60 in LINGERING_NOTES:
        decay = amp(db + gain_db - 60 * t / t60)
        note = decay * np.sin(2 * np.pi * hz * t) * (1 - np.exp(-t / swell_s))
        add(out, s, np.array([note, note]))
    return out


def background(rumble_db=-3.5, hiss_db=3, throb_hz=33.46, throb_share=0.55):
    """Tone in noise: a steady low tone and band noise throb together under a faint hiss."""
    noise = np.sqrt(1 - throb_share) * unit(tint(noise_pair(N), RUMBLE_SPECTRUM))
    tone = np.sqrt(2 * throb_share) * np.sin(2 * np.pi * throb_hz * TIME)
    rumble = (noise + tone) * amp(rumble_db + over_time(RUMBLE_COURSE))
    hiss = unit(tint(noise_pair(N), HISS_SPECTRUM)) * amp(hiss_db + over_time(HISS_COURSE))
    return rumble + hiss


def noise_pair(size):
    """Diffuse-field coherence: noise at two microphones, alike in the bass, unlike in the treble."""
    a, b = rfft(rng.standard_normal((2, size)))
    same = np.clip(read(STEREO_LIKENESS, np.fft.rfftfreq(size, 1 / SR)), -1, 1)
    mid, side = a * np.sqrt((1 + same) / 2), b * np.sqrt((1 - same) / 2)
    return irfft(np.array([mid + side, mid - side]), size)


def heard(sound, response, peak_db):
    """Convolution: one short sound through a response, its two-channel mean set to a peak level."""
    wet = signal.fftconvolve(sound[None], response, axes=1)
    return amp(peak_db) * wet / abs(wet.mean(0)).max()


def tint(x, points):
    """Linear filtering: weights the spectrum of x by a table of frequency and dB."""
    size = next_fast_len(x.shape[-1] + 2048)
    gain = amp(read(points, np.fft.rfftfreq(size, 1 / SR)))
    return irfft(rfft(x, size) * gain, size)[..., :x.shape[-1]]


def read(points, hz):
    """Logarithmic pitch scale: reads a table along a log-frequency axis."""
    f, value = np.transpose(points)
    return np.interp(np.log(hz + 1), np.log(f + 1), value)


def over_time(points):
    """Envelope: reads a table of time and value at every sample."""
    return np.interp(TIME, *np.transpose(points))


def add(mix, s, sound):
    """Superposition: mixes a sound in at time s."""
    part = mix[:, max(round(s * SR), 0):][:, :sound.shape[1]]
    part += sound[:, :part.shape[1]]


def amp(db):
    """Decibel law: level to amplitude gain."""
    return 10 ** (np.asarray(db) / 20)


def unit(x):
    """Normalization: scales to an rms of 1."""
    return x / np.sqrt(np.mean(x ** 2) + 1e-20)


def scene():
    """Superposition: water leaning left or right by pitch, handling noises and the background."""
    left, right = pour() + clouds() + plops() + slaps()
    left = tint(left, [(hz, db / 2) for hz, db in STEREO_LEAN])
    right = tint(right, [(hz, -db / 2) for hz, db in STEREO_LEAN])
    handling = knocks() + scuffs() + clunk() + tipping()
    return np.array([left, right]) + handling + hums() + background()


def record(dry):
    """Band limitation: a linear-phase low-pass at the recorder's upper edge."""
    lowpass = signal.firwin(511, EDGE_HZ, window=("kaiser", 9), fs=SR)
    return signal.oaconvolve(dry, lowpass[None], "same")


dry = scene()
out = record(dry)
to_wav(out)
```